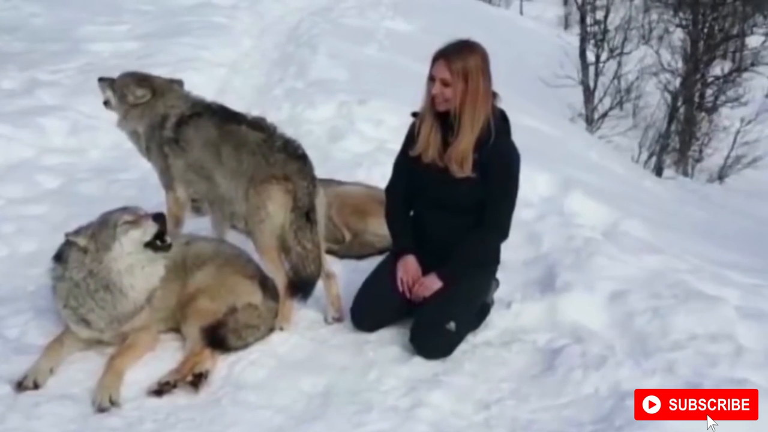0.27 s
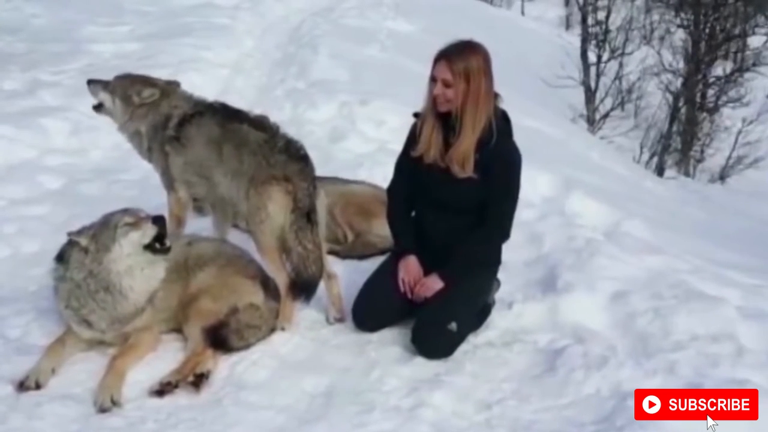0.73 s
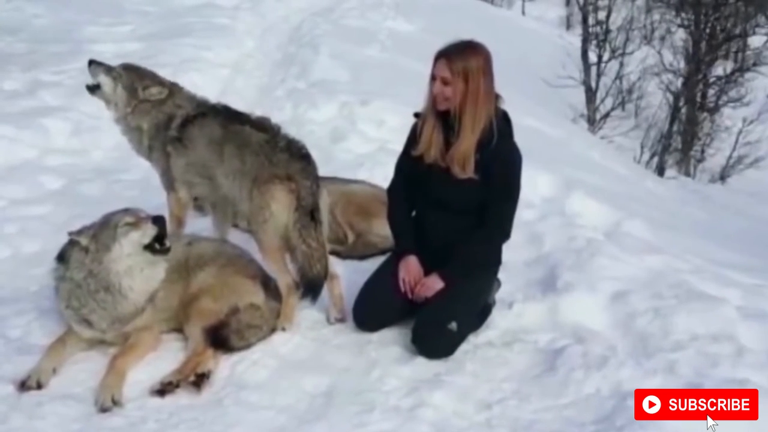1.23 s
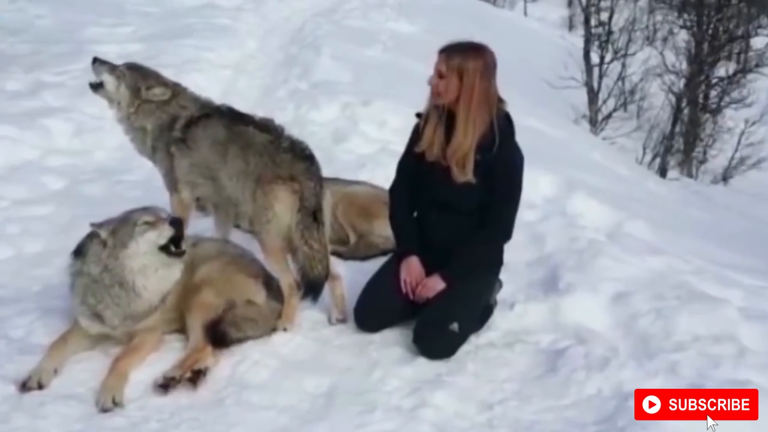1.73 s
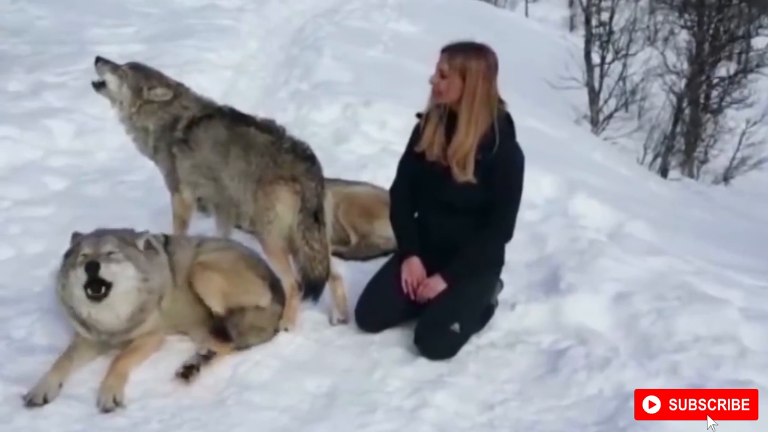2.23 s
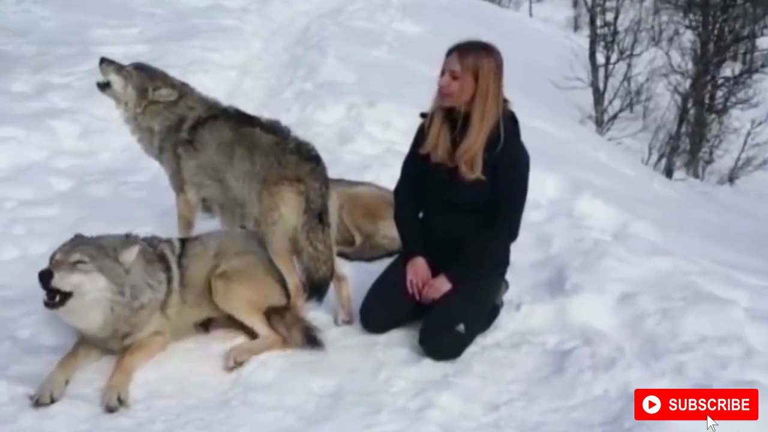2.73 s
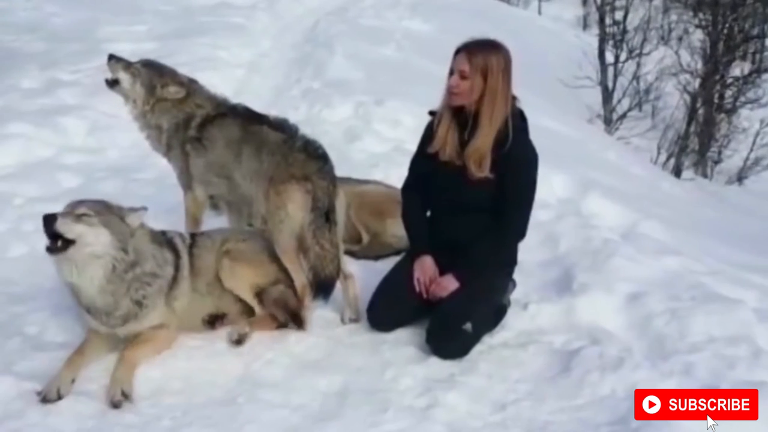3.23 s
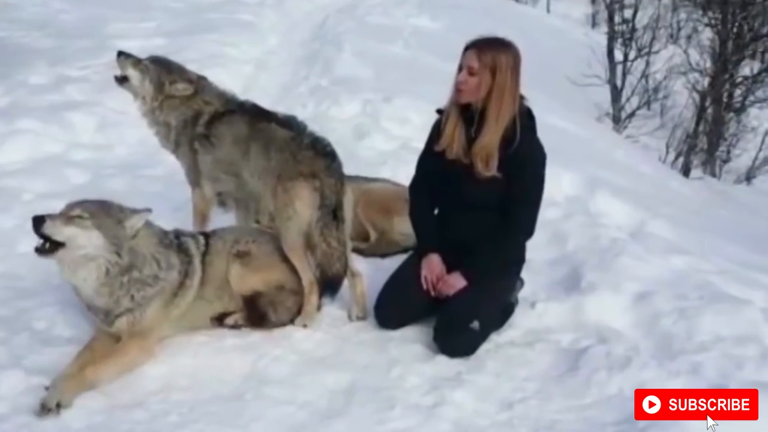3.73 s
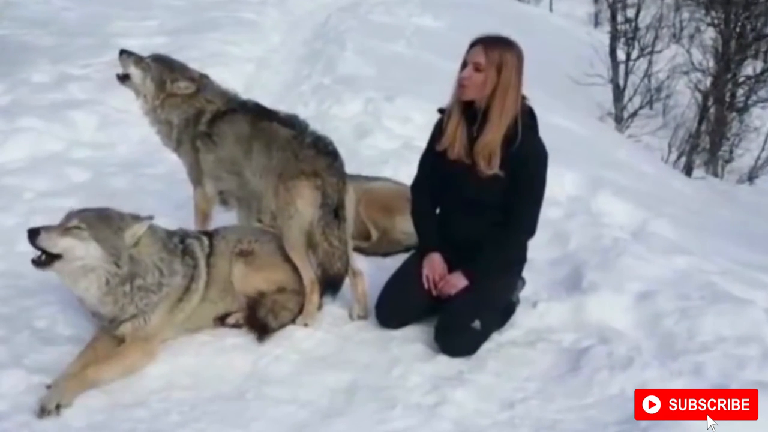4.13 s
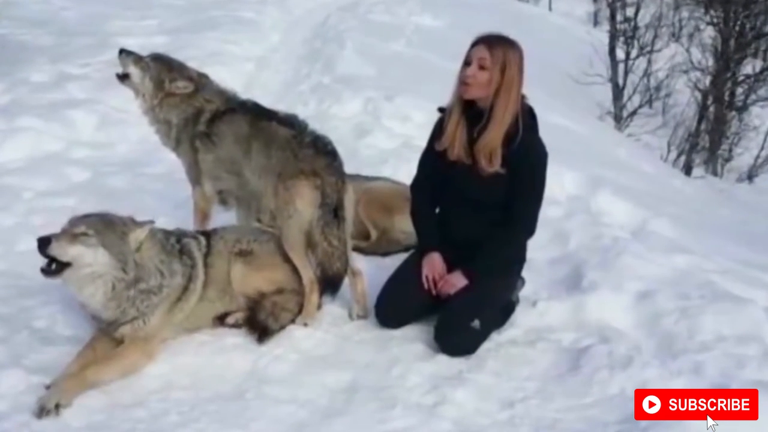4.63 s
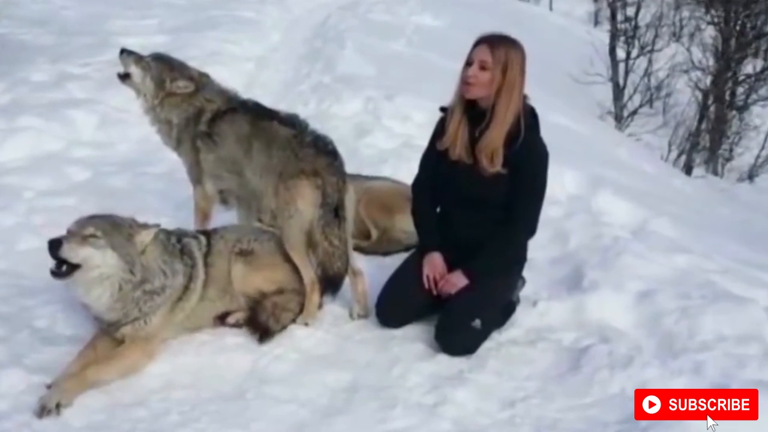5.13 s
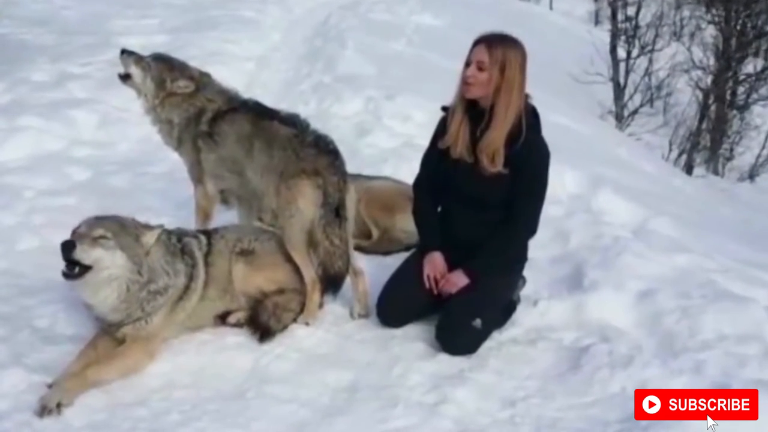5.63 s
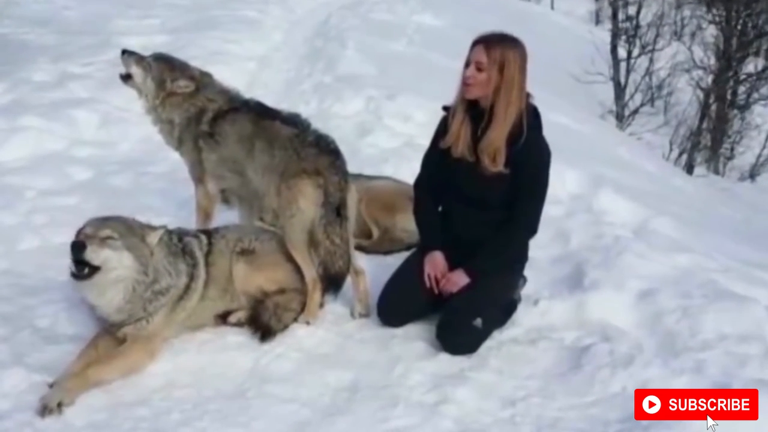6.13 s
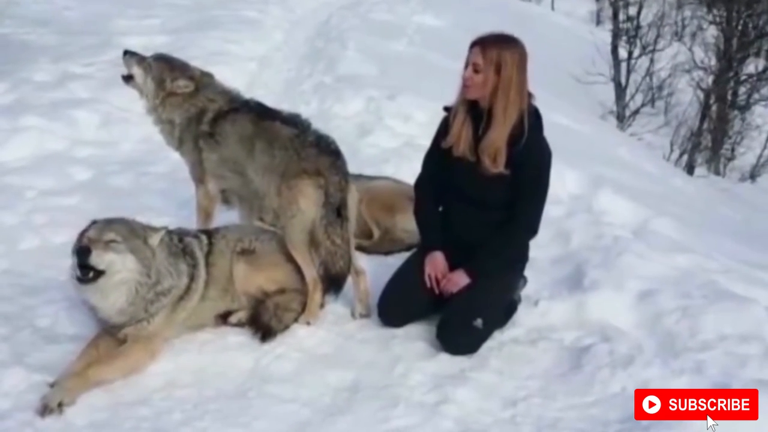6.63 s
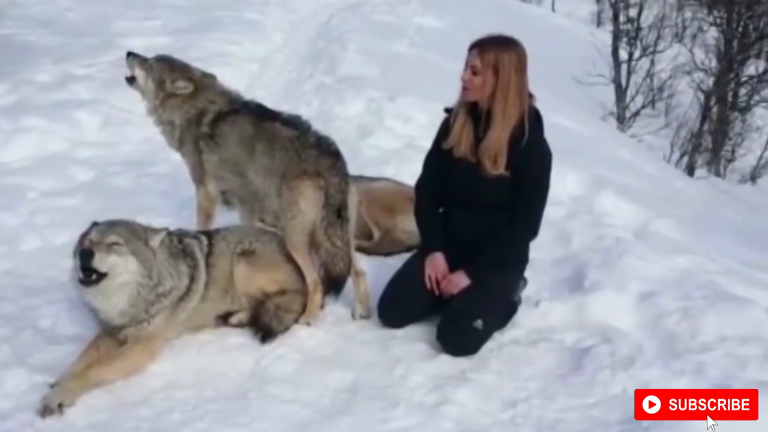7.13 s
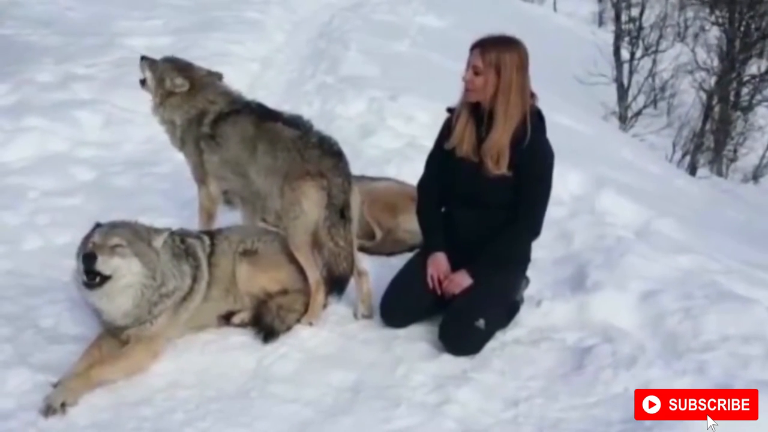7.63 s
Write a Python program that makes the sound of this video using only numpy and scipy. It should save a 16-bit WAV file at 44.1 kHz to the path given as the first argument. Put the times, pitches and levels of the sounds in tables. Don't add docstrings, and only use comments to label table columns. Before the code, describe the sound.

From 0 s a nearby wolf is mid-howl, low and pressing around 230-300 Hz, with quick yodel leaps and a big crack near 1.5 s; faint distant whines fall during the first 0.4 s. At about 0.85 s two more join: one rises to a pure, nearly sine-like note settling around 390 Hz, the other starts high, yelps sharply at 1.1 s, crests at 1.4 s and glides down. The first breath ends near 2.8 s. From 3 s the wavering wolf resumes with leaps and hoarse breaks around 3.5-4.6 s, then fades higher. The yelper's tail sinks from 370 to 220 Hz through 7.9 s; the pure note ends near 5.9 s. Soft far whines return near 6.1 and 7 s. Throughout: thin tree echo, faint hiss; small low wind puffs on the left, mostly early. Close outdoor stereo, top end cut and slightly fluttery.

```python
import sys
import numpy as np
from scipy import signal
from scipy.fft import rfft, irfft, next_fast_len
from scipy.io import wavfile
from scipy.ndimage import uniform_filter1d

SR = 44100
rng = np.random.default_rng(int(sys.argv[2]) if len(sys.argv) > 2 else 0)


def ratio_of_db(decibels):
    return 10 ** (np.asarray(decibels, float) / 20)


def put_to_file(sound):
    columns = np.atleast_2d(sound).T
    safe = np.clip(columns, -1, 1)
    whole_steps = np.round(safe * 32767)
    wavfile.write(sys.argv[1], SR, whole_steps.astype(np.int16))


N = 347067


def evened(x):
    return x / np.sqrt(np.mean(x ** 2) + 1e-20)


def read(points, hz):
    f, value = np.transpose(points)
    return np.interp(np.log(hz + 1), np.log(f + 1), value)


def coloured(x, level_db):
    size = next_fast_len(x.shape[-1])
    gain = ratio_of_db(level_db(np.fft.rfftfreq(size, 1 / SR)))
    return irfft(rfft(x, size) * gain, size)[..., :x.shape[-1]]


def drift(count, hz):
    span = max(int(SR / hz), 1)
    x = rng.standard_normal(count)
    for _ in range(2):
        x = uniform_filter1d(x, span, mode="wrap")
    return evened(x)


def unrolled(rows, leaps, point):
    s, *columns = np.transpose(rows)
    start = round(s[0] * SR)
    t = np.arange(start, min(round(s[-1] * SR), N)) / SR
    hz, effort_db, *rest = [np.interp(t, s, c) for c in columns]
    for at, leap_hz, rise, fall, push_db in leaps:
        shape = np.exp(-(abs(t - at) / np.where(t < at, rise, fall)) ** point)
        hz = hz + leap_hz * shape
        effort_db = effort_db + push_db * shape
    return start, [uniform_filter1d(c, 600, mode="nearest") for c in [hz, effort_db, *rest]]


# (frequency [Hz], width [Hz], level over the throat's last point [dB])
MUZZLE = [(2531, 95, 11.5), (3560, 47, 3.5), (5335, 380, 0), (6286, 100, 3), (6770, 1200, -6.5)]


def tract(throat, hz):
    top_hz, top_db = throat[-1]
    grid = np.arange(0, SR / 2, 10)
    low = ratio_of_db(read(throat, grid) - 39 * np.log2(np.maximum(grid / top_hz, 1)))
    high = sum(ratio_of_db(top_db + db) / (1 + (2 * (grid - f) / width) ** 2) for f, width, db in MUZZLE)
    return np.interp(hz, grid, 20 * np.log10(low + high))


def voice(start, hz, level_db, throat, jitter, shimmer_db, breath_db, murk, hoarse=0):
    top_hz = 9000
    tone, air, count = np.zeros(N), np.zeros(N), len(hz)
    call = slice(start, start + count)
    turns = np.cumsum(hz * (1 + jitter * (1 + 14 * hoarse) * drift(count, 90))) / SR
    since = np.arange(count) + N * (start == 0)
    until = np.arange(count)[::-1] + N * (start + count >= N)
    edge = np.clip(np.minimum(since, until) / 900, 0, 1)
    quick, slow, eddies = drift(count, 40), drift(count, 7), drift(count, 500)
    power = 0
    for k in range(1, int(top_hz / hz.min())):
        partial_hz = k * hz
        gain = edge * ratio_of_db(level_db(k)) * (partial_hz < top_hz)
        shift = rng.integers(count)
        blur = np.clip(((partial_hz - 2000) / 2500).clip(0) ** 2 + hoarse * k / 12, 0, murk)
        swing = np.sqrt(1 - blur) + np.sqrt(blur) * np.roll(eddies, shift)
        shimmer = shimmer_db * np.sqrt(min(k, 9)) * np.roll(quick, shift)
        mid_weight = np.clip(partial_hz / 1500 - .7, 0, 1) * np.clip(2 - partial_hz / 3000, .3, 1)
        wander_db = shimmer + 5 * murk * mid_weight * np.roll(slow, shift)
        wave = np.cos(2 * np.pi * (k * turns + rng.random()))
        tone[call] += np.sqrt(2) * gain * ratio_of_db(wander_db) * swing * wave
        power = power + gain ** 2
    puffs = (0.4 + np.exp(-(turns % 1) / 0.42)) * rng.standard_normal(count)
    air[call] = np.sqrt(power) * ratio_of_db(14 * hoarse) * puffs
    breath = coloured(air, lambda f: tract(throat, f) + 1.7 * np.log2(np.maximum(f / 1500, 1)))
    return tone + ratio_of_db(breath_db) * breath


# (time [s], resting pitch [Hz], effort [dB], brightness about the throat peak [dB per octave])
WAVERING = [
    [(0.0, 234.3, -24, 2.5), (.6, 245.1, -20.5, 1), (.9, 274.4, -22, 2), (1.3, 256.7, -19, 2.5),
     (1.88, 258.8, -21, 1.5), (1.95, 292.3, -17.5, 1.5), (2.13, 282.5, -16.5, 2.5), (2.7, 263.9, -22, 1.5),
     (2.83, 406, -30, 1)],
    [(3.0, 232, -29.5, 1), (3.55, 229, -33, -6), (3.8, 260, -28, -1), (4.3, 283.2, -27.5, -0.5),
     (4.6, 314, -27.5, -3.5), (5.8, 324.4, -31.5, -1), (6.12, 298, -28, -0.5), (6.5, 327.8, -30, -6),
     (7.87, 356.4, -36, -15.5)],
]
# (time [s], leap [Hz], rise [s], fall [s], push [dB])
YODELS = [(0.0, 37, 0.022, .04, 4), (0.209, 27.6, 0.022, .04, 1.5), (0.369, 9.3, 0.022, 0.073, 0.5),
          (0.499, 4, .08, .08, 0.5), (.635, 90, .018, .08, 0.5), (.715, 35, 0.028, .07, 2.5),
          (1.169, 109, 0.036, .05, 2), (1.46, 285, .055, 0.059, 10), (1.678, 40, 0.018, .035, -4),
          (1.769, 24, .025, .05, 2), (2.03, 11, 0.031, .04, -0.5), (2.195, 113, .045, .03, 0),
          (2.275, 85, .045, 0.049, 3), (2.382, 32, .05, 0.094, 3)]
# (time [s], leap [Hz], rise [s], fall [s], push [dB])
LATE_YODELS = [(3.01, 137.5, .03, .1, -1), (3.169, 63, .04, .03, 10.5), (3.758, -5, .12, .06, -11),
               (3.869, 69.5, .025, .06, 3), (4.15, 13, 0.039, 0.027, 1.5), (4.406, 85.5, .035, .09, 1),
               (4.494, 62.5, .06, .035, 6.5), (4.669, 19.5, .035, .06, -0.5), (4.801, 45, .1, .3, 2.5),
               (5.332, 21, .04, .2, 3), (5.885, 49, .045, 0.078, 8.5), (6.55, 10, 0.077, .08, 0),
               (7.051, -7, .2, 0.076, -1), (7.148, 13, 0.033, 0.089, 1), (7.392, 16.5, .03, .04, 1),
               (7.57, 26.5, 0.061, 0.022, 0), (7.86, -19, 0.025, 0.043, -4)]
TURNED_DB = (-3, -11)
# (time [s], hoarseness [0-1])
HOARSE = [(1.351, 0.02), (1.472, .25), (1.58, 0.03), (3.501, 0.06), (3.618, 0.3), (3.839, 0.6),
          (3.921, 0.15), (4.5, 0.05), (4.62, 0)]
# (frequency [Hz], level [dB])
WAVERING_THROAT = [(220.0, -18.5), (330.0, -19.5), (480.0, -8), (600.0, -14), (700.0, -0.6), (770.0, 4.5),
                   (860.0, -15), (1000.0, -25.5), (1250.0, -13), (1500.0, -36.5), (1770.0, -23),
                   (2200.0, -32), (2800.0, -53.5)]


def wavering_wolf():
    rush_hz_per_s, rush_db = 3500, 6
    out = np.zeros(N)
    for rows, leaps, turned_db in zip(WAVERING, (YODELS, LATE_YODELS), TURNED_DB):
        start, (hz, effort_db, bright_db) = unrolled(rows, leaps, point=1.4)
        hoarse = np.interp((start + np.arange(len(hz))) / SR, *np.transpose(HOARSE))
        dull_db = 0.51 * np.minimum(effort_db + 31.0, 0)
        rushed = np.clip(abs(np.gradient(hz)) * SR / rush_hz_per_s, 0, 1)

        def level_db(k):
            octaves_up = np.log2(k * hz / 1000)
            unfilled_db = rush_db * rushed * np.exp(-((k * hz - 760) / 90) ** 2)
            bright = bright_db * np.log2(k * hz / 800)
            lost = dull_db * np.clip(octaves_up, 0, 1) + turned_db * np.clip(octaves_up, 0, .7)
            return effort_db + tract(WAVERING_THROAT, k * hz) - unfilled_db + bright + lost

        out += voice(start, hz, level_db, WAVERING_THROAT, jitter=.003, shimmer_db=1.18,
                     breath_db=-14.5, murk=0.75, hoarse=hoarse)
    return out


# (frequency [Hz], level [dB])
THROAT = [(210, -19), (300, 1), (800, 5.5), (1200, 0.5), (1500, -3), (1800, -2.5), (2200, -31.5),
          (2800, -36)]


def steady_wolf(rows, swells, point, mouth_db, roll_db, breath_db):
    mouth_width_hz = 168
    start, (hz, effort_db, mouth, tilt_db) = unrolled(rows, swells, point)

    def level_db(k):
        lift_db = mouth_db / (1 + ((k - mouth) * hz / mouth_width_hz) ** 2)
        tilt = tilt_db * np.log2(np.maximum(min(k, 4) / mouth, 1))
        roll = roll_db * np.log2(max(k / 3, 1))
        return effort_db + tract(THROAT, k * hz) + lift_db + tilt + roll

    return voice(start, hz, level_db, THROAT, jitter=0.0029, shimmer_db=0.86,
                 breath_db=breath_db, murk=0.15)


# (time [s], pitch [Hz], effort [dB], partial the mouth is tuned to, tilt [dB per octave])
HOLDING = [(.83, 199, -68.5, 1.6, -15.5), (.92, 313.5, -63.5, 2.0, -7.5), (.97, 380.3, -56.5, 1.0, 11.5),
           (1.07, 392, -49.5, 1.0, -19.5), (1.25, 486, -55.5, 1.0, -5.5), (1.36, 496, -61.5, 1.0, -3),
           (1.5, 476, -56, 1.0, 19), (1.58, 426, -49.5, 1.0, 12.5), (1.72, 410.8, -52.5, 1.0, 7),
           (2.95, 392, -52.5, 1.0, 0.5), (3.5, 395.2, -51.5, 1.0, 2), (4.4, 375.4, -56, 1.0, 0.5),
           (4.65, 385.7, -53, 1.0, 0), (5.4, 385.8, -55, 1.0, 4), (5.8, 372, -59.5, 1.0, 4.5),
           (5.9, 375, -69.5, 1.0, 8)]


def holding_wolf():
    return steady_wolf(HOLDING, [], point=1.9, mouth_db=32, roll_db=-21, breath_db=-43.5)


# (time [s], pitch [Hz], effort [dB], partial the mouth is tuned to, tilt [dB per octave])
YELPING = [
    (.845, 678.6, -37.5, 1.8, 0),
    (1.19, 633, -32, 1.7, -1.5),
    (1.39, 695, -28, 1.7, 2.5),
    (1.6, 642, -31.5, 1.7, 2),
    (1.78, 544.4, -30, 1.4, 1.5),
    (1.84, 482, -32, 1.0, -3.5),
    (2.04, 449.7, -31.5, 1.0, -2.5),
    (2.24, 426.8, -34.5, 1.0, 0.5),
    (2.955, 397.8, -32.5, 1.2, -1.5),
]
# (time [s], leap [Hz], rise [s], fall [s], push [dB])
YELP_SWELLS = [
    (.852, 120, .02, .015, -5),
    (0.908, 65, .025, .035, 1),
    (1.075, 344.5, .062, .057, 14),
    (2.58, 20, .16, .22, 1.5),
    (2.96, -21.5, .03, .03, -2.5),
]


def yelping_wolf():
    return steady_wolf(YELPING, YELP_SWELLS, point=2.9, mouth_db=15.5, roll_db=0, breath_db=-23.5)


# (time [s], pitch [Hz], effort [dB], partial the mouth is tuned to, tilt [dB per octave])
SINKING = [
    (2.935, 367.9, -34.5, 2.0, -3),
    (3.7, 360.3, -34, 1.7, -3.5),
    (3.95, 348.5, -39, 1.81, -1.5),
    (4.55, 335.8, -40.5, 1.7, -3),
    (4.95, 363.1, -38, 1.95, -1.5),
    (5.95, 330.3, -43, 1.65, -4),
    (7.2, 289, -52.5, 1.9, -2.5),
    (7.45, 245.2, -46, 2.0, -14.5),
    (7.87, 220.2, -42, 2.0, -16),
]
# (time [s], leap [Hz], rise [s], fall [s], push [dB])
SINK_SWELLS = [
    (3.249, 2, .2, 0.28, 0),
    (4.661, 8.5, .04, .08, 1.5),
    (4.859, 18.5, 0.076, 0.049, 4.5),
    (6.302, 9, .25, .15, 0),
    (6.709, -9, .08, .06, -2),
    (6.861, 8, 0.072, .15, 1.5),
    (7.58, 25, .07, .08, -3.5),
    (7.79, -9, 0.034, 0.053, 2),
]


def sinking_wolf():
    return steady_wolf(SINKING, SINK_SWELLS, point=1.9, mouth_db=14, roll_db=2.68, breath_db=-27.5)


# (start [s], length [s], from [Hz], to [Hz], level [dB])
FAR = [
    (0.0, .13, 737, 639, -25),
    (.12, 0.041, 746, 796, -23),
    (.15, 0.069, 826, 730, -31.5),
    (.215, 0.068, 830, 685, -27.5),
    (0.303, .05, 653, 498, -28),
    (6.131, .23, 450.8, 473, -41),
    (6.118, 0.18, 756, 784, -32.5),
    (6.998, .14, 279, 211.6, -47.5),
]


def far_whines():
    out = np.zeros(N)
    for s, length, from_hz, to_hz, db in FAR:
        u = np.arange(round(length * SR)) / (length * SR)
        turns = np.cumsum(from_hz + (to_hz - from_hz) * u ** 3.3) / SR
        overtone = ratio_of_db(-12.5) * (from_hz > 690) * (s < 1)
        tone = np.sin(2 * np.pi * turns) + overtone * np.sin(2 * 2 * np.pi * turns)
        out[round(s * SR):][:len(u)] += ratio_of_db(db) * np.sin(np.pi * u ** 0.96) * tone
    return out


# (frequency [Hz], lead [radians])
PORT_LEAD = [(400, .36), (750, .42), (1100, .75), (1380, 1.3), (2200, 1.6), (5000, 1.25), (9000, .65)]
# (frequency [Hz], left minus right [dB])
PORT_TILT = [(500, 0.66), (1000, -0.5), (1700, 2.5), (2600, 3), (12000, -0.8)]


def ports(x, tilt_db, lead):
    size = next_fast_len(N + 4096)
    hz = np.fft.rfftfreq(size, 1 / SR)
    half = ratio_of_db((read(PORT_TILT, hz) + tilt_db) / 2) * np.exp(1j * lead * read(PORT_LEAD, hz) / 2)
    return irfft(rfft(x, size) * np.array([half, 1 / half]), size)[:, :N]


# (frequency [Hz], time to fall 60 dB [s])
ECHO = [(300, 0.73), (2500, 0.57), (8000, 0.23)]


def trees(x):
    length, first, spacing = SR // 2, 400, 20
    taps = np.zeros((2, length))
    slots = np.arange(first, length - spacing, spacing)
    at = slots + rng.integers(0, spacing, (2, len(slots)))
    np.put_along_axis(taps, at, rng.choice([-1., 1.], at.shape), 1)
    taps[1] = 0.58 * taps[0] + .5 * taps[1]
    hz, t, z = signal.stft(taps, SR, nperseg=256)
    tail = signal.istft(z * ratio_of_db(-60 * t / read(ECHO, hz)[:, None]), SR, nperseg=256)[1]
    return signal.fftconvolve(x[None], tail / np.linalg.norm(tail[0]), axes=1)[:, :N]


# (time [s], level [dB])
GUSTS = [(0.171, -42), (0.448, -45), (0.722, -56), (0.931, -51), (1.432, -50), (1.6, -51), (1.903, -41),
         (2.241, -43), (2.701, -57), (2.87, -47), (3.202, -46), (3.349, -59.5), (3.929, -57),
         (4.362, -51.5), (4.429, -53), (5.089, -56), (6.648, -54)]
# (frequency [Hz], level [dB])
WIND = [(20, -4.5), (60, 1.5), (130, -4.5), (200, -15.5), (300, -16.5), (1000, -78)]


def wind():
    t = np.arange(N) / SR
    puffs = ratio_of_db(-80) + sum(ratio_of_db(db) / (1 + ((t - s) / 0.036) ** 2) for s, db in GUSTS)
    rumble = evened(coloured(rng.standard_normal((2, N)), lambda hz: read(WIND, hz)))
    left_db = 0.7 * drift(N, 24) + 3
    right_db = 2.5 * drift(N, 14) - 11
    return rumble * puffs * ratio_of_db([left_db, right_db])


# (frequency [Hz], level [dB])
HISS = [(30, 0), (1500, -11), (4000, -17), (10000, -19), (13500, -13), (15700, -14)]


def hiss():
    shared, apart = rng.standard_normal(N), rng.standard_normal((2, N))
    return ratio_of_db(-72) * evened(coloured(shared + 0.5 * apart, lambda hz: read(HISS, hz)))


# (left minus right [dB], share of the port lead)
PLACES = [
    (.4, 1.05),
    (-.5, .93),
    (1.1, 1.0),
    (-.7, 1.08),
    (0, 1.0),
]


def scene():
    far = far_whines()
    wolves = [wavering_wolf(), holding_wolf(), yelping_wolf(), sinking_wolf(), far]
    direct = sum(ports(wolf, *place) for wolf, place in zip(wolves, PLACES))
    echo = ratio_of_db(-22.0) * trees(sum(wolves) + 2 * far)
    return direct + echo + wind() + hiss()


def top_cut(x):
    return signal.sosfilt(signal.butter(12, 15770, fs=SR, output="sos"), x)


def record(dry):
    hz, t, z = signal.stft(dry, SR, nperseg=1024)
    middle = abs(z.mean(0)) ** 2
    patch = uniform_filter1d(middle, 6, axis=0)
    loud = middle.sum(0) ** .7
    kept = (patch > ratio_of_db(2 * -89.5) * loud) | (hz < 3300)[:, None]
    bands, swing_db = 24, 11
    chance = np.repeat(rng.standard_normal((bands, len(t))), 3, axis=1)[:, :len(t)].clip(-4, 1)
    flutter = ratio_of_db(swing_db * chance * np.clip(loud / loud.max() * 3.5, 0, 1))
    band_of = np.arange(len(hz)) * bands // len(hz)
    kept = kept * np.where((hz > 7800)[:, None], flutter[band_of], 1)
    thinned = signal.istft(z * kept, SR, nperseg=1024)[1][:, :N]
    return top_cut(thinned)


dry = scene()
out = record(dry)
put_to_file(out)
```